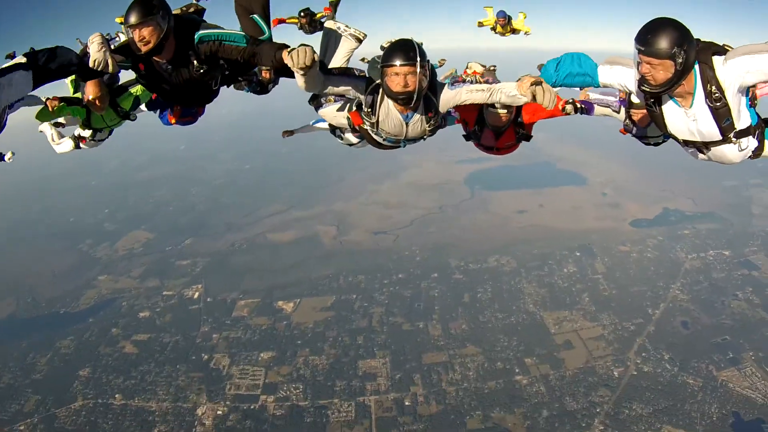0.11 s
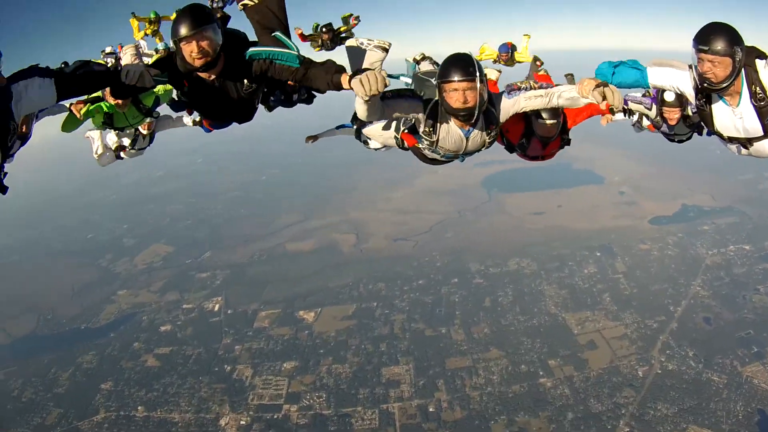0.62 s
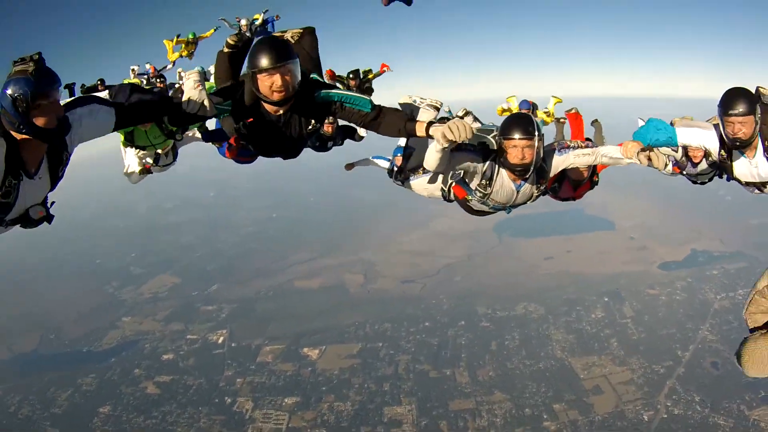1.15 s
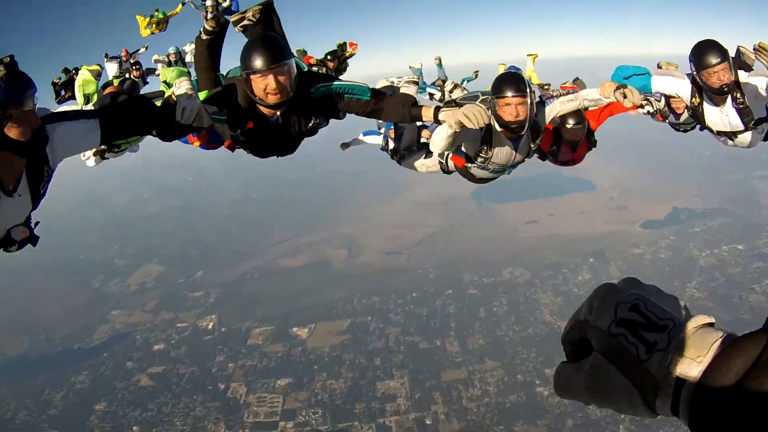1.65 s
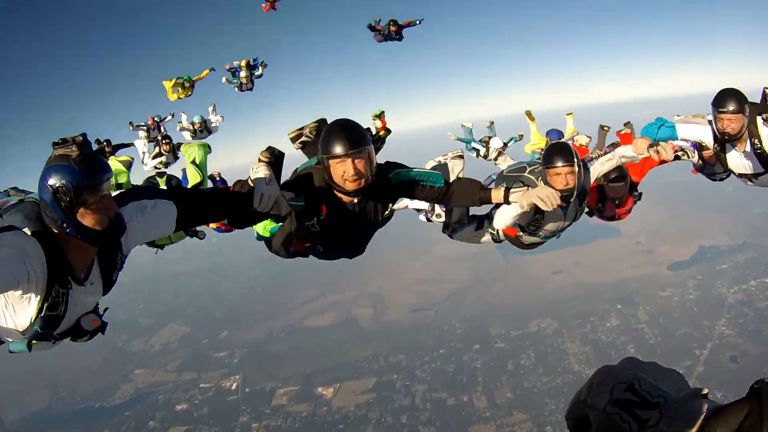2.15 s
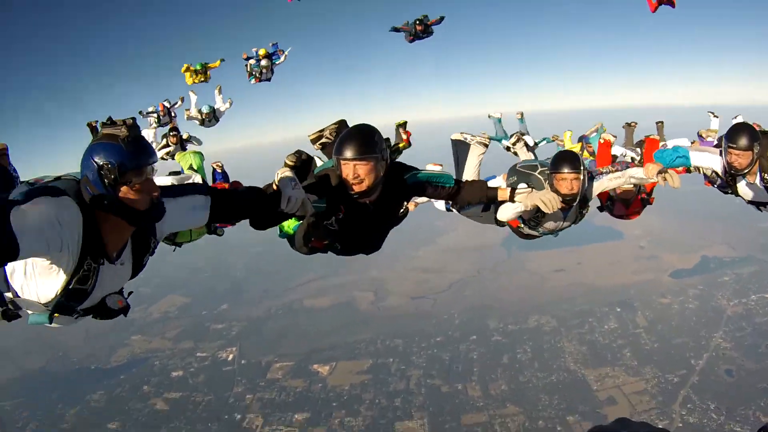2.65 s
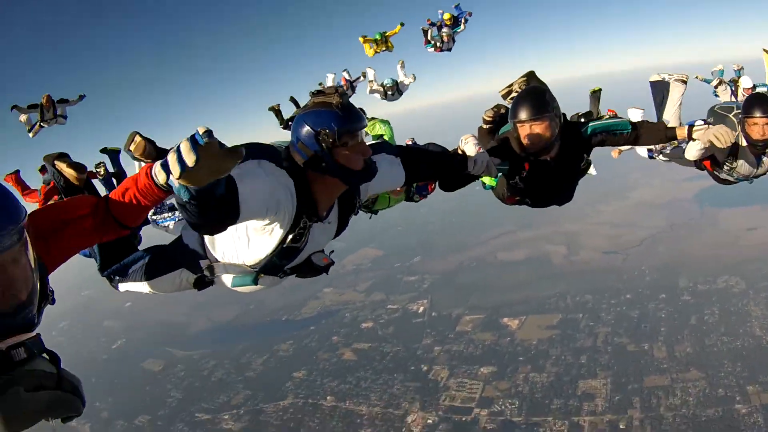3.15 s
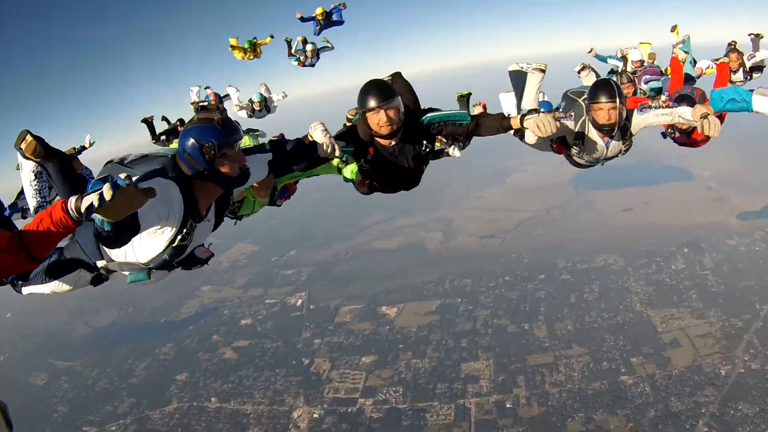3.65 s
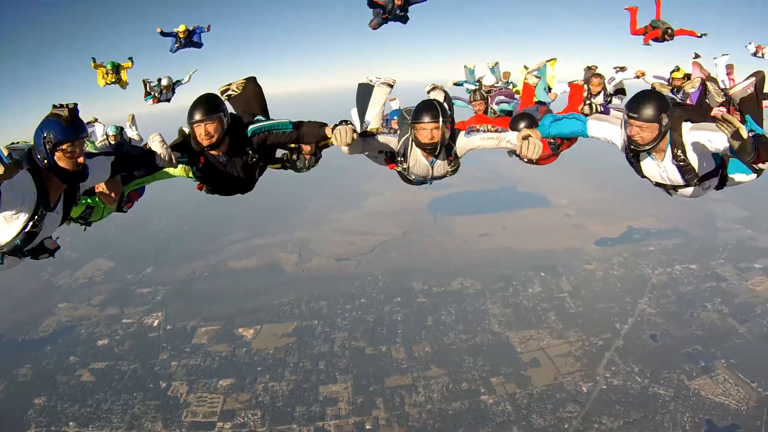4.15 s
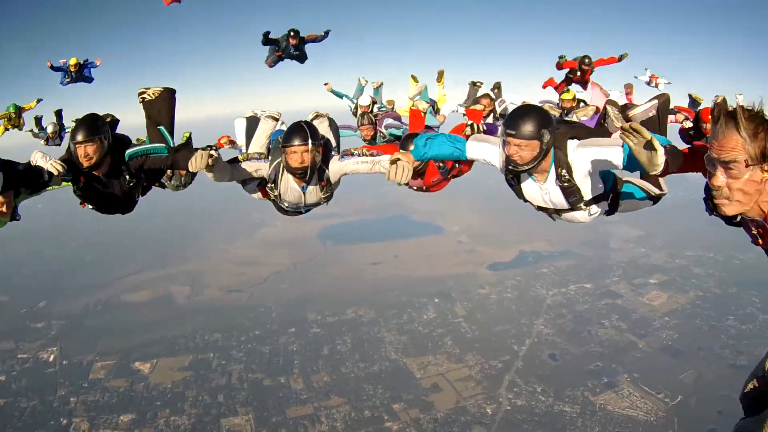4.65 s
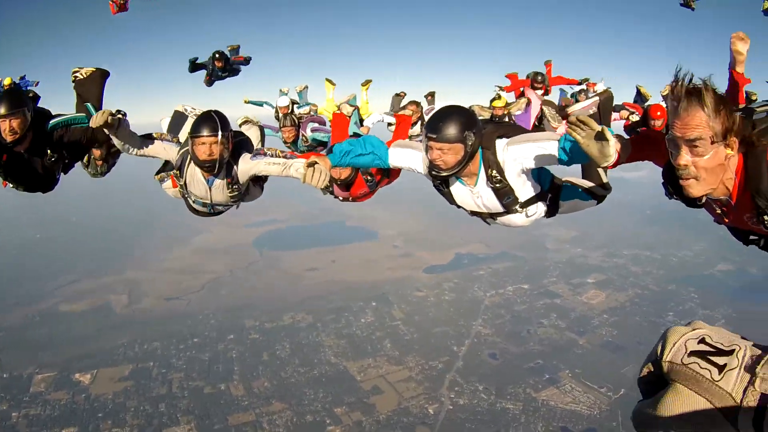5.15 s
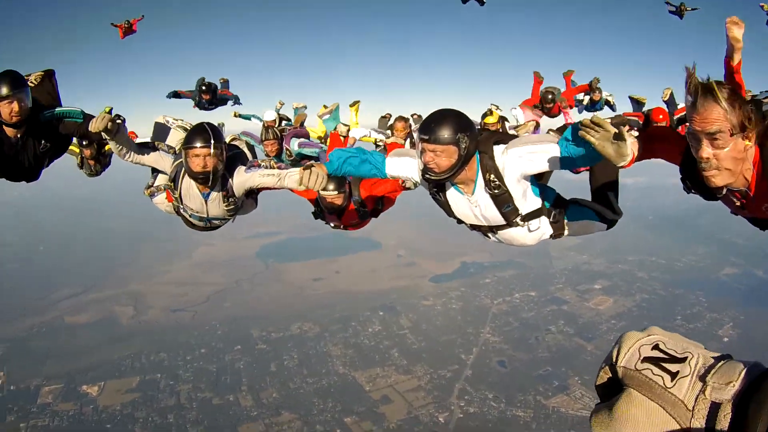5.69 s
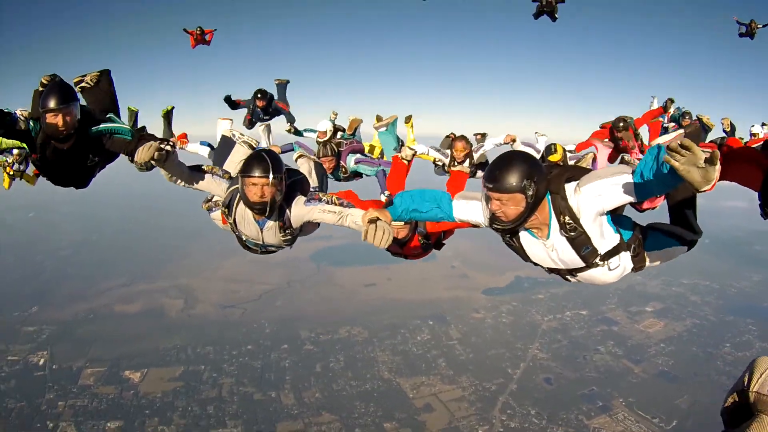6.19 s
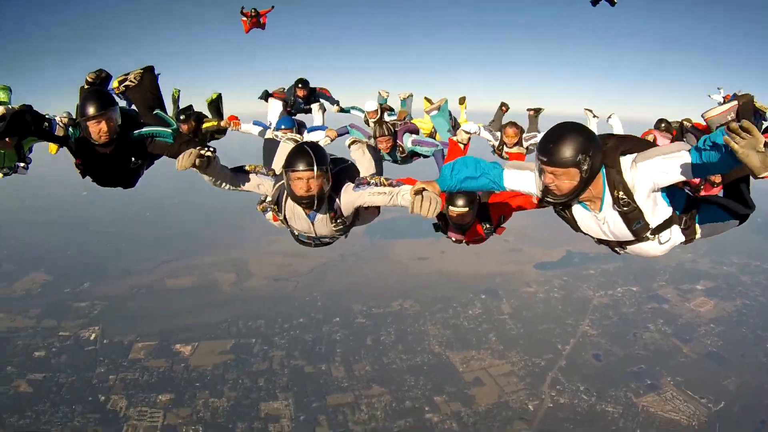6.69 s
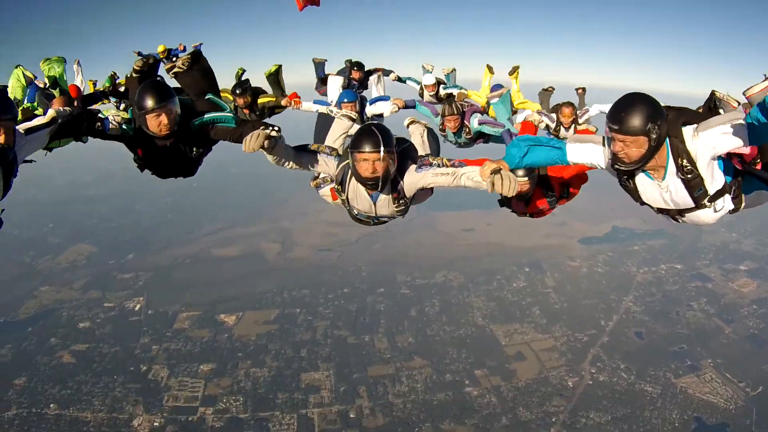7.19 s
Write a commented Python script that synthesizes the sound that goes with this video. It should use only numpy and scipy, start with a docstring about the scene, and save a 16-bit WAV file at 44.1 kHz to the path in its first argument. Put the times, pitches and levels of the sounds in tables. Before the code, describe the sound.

A skydiver's helmet microphone in free fall, high in open sky with no echo. Air tears past without pause, so strong that it overloads into a gritty, crackling roar. Raspy and hissy turbulence flutters over it in quick irregular puffs. Dry ticks snap on the housing, clustering around four seconds. The overall level stays nearly steady from start to end, with only momentary drops.

```python
"""Open sky, in free fall: air tears past a helmet microphone so hard that its capsule swings from rail to rail.
Shaped noises make the slow buffeting, the roar and drone of eddies shed off the housing, the rasp, hiss and fizz.
A soft limiter overloads their sum; a wind filter turns swings into spikes and gain control steadies the level.
Dry ticks and a faint patter ring the housing, and a little hiss seeps through it, all added past the overload."""
import sys
import numpy as np
from scipy import signal
from scipy.fft import rfft, irfft, next_fast_len
from scipy.io import wavfile
from scipy.ndimage import uniform_filter1d, map_coordinates

SR = 44100
rng = np.random.default_rng(int(sys.argv[2]) if len(sys.argv) > 2 else 0)


def linear_from_db(decibels):
    """Turn decibels (scalar or array-like) into linear amplitude factors; 0 gives 1."""
    return 10 ** (np.asarray(decibels, float) / 20)


def persist_wave(psi):
    """Save psi, clipped to +-1, as 16-bit WAV."""
    counts = np.round(np.clip(psi, -1, 1) * 32767).astype(np.int16)
    wavfile.write(sys.argv[1], SR, np.atleast_2d(counts).T)


N = 322371  # length in samples

# In all noise colours level_db is relative, per Hz: each noise is then scaled to rms 1.

# Large eddies at the port as the head turns, before the drive:
# [time_s, roar_level_db, buffet_over_roar_db, roar_pitch_hz]
LARGE_EDDIES = [(0, -27.5, 5.5, 336.2), (.45, -27, 3.5, 283.5), (.8, -24, 3.5, 310.1),
                (.97, -25.5, 3, 300.2), (1.15, -19.5, -8.5, 290.6), (1.39, -23, 3, 309.2),
                (1.46, -25, -3.5, 499.3), (1.9, -25, 1, 424.8), (2.05, -25, 1, 365.6),
                (2.8, -21.5, -3, 330.2), (3.05, -29, 3.5, 368.6), (3.5, -29, 5, 353.2),
                (3.95, -25.5, 3, 397.9), (4.2, -25, 3, 360.5), (4.33, -24, 5.5, 259.5),
                (4.5, -20.5, 4.5, 309.5), (4.62, -26, -1.5, 525), (5.5, -26.5, -3, 516),
                (6.6, -27.5, -2, 501), (7.08, -29.5, 3.5, 432), (7.2, -30, 6, 280), (7.31, -26, 13, 256.6)]
# Small eddies, before the drive: [time_s, rasp_level_db, hiss_level_db, fizz_level_db]
SMALL_EDDIES = [(0, -40.5, -46, -48.5), (.3, -42, -45.5, -50.5), (.9, -40.5, -43, -47.5),
                (1.3, -41.5, -45.5, -49.5), (1.39, -37, -43.5, -42.5), (1.52, -39.5, -56, -48.5),
                (1.75, -47, -58.5, -51), (2.0, -48, -62, -53), (2.9, -47.5, -57, -49), (3.2, -46, -50, -57),
                (3.45, -44, -48.5, -51.5), (3.75, -42, -49.5, -50), (4.1, -41, -46.5, -47.5),
                (4.28, -37.5, -46, -44.5), (4.32, -47, -46.5, -55), (4.4, -41.5, -48, -49.5),
                (4.49, -44.5, -42, -47), (4.58, -35.5, -49.5, -43.5), (4.68, -39, -49.5, -48),
                (4.78, -36.5, -48.5, -48), (5.05, -42, -51, -45.5), (5.6, -40, -50.5, -45),
                (6.1, -43, -50.5, -46.5), (6.5, -39.5, -50, -47.5), (6.8, -43.5, -48.5, -49.5),
                (7.1, -40.5, -48.5, -51), (7.24, -44.5, -45, -49.5), (7.31, -48, -45.5, -49)]
# Colour of the roar: [multiple_of_roar_pitch, level_db]
ROAR_COLOUR = [(.2, -22), (.45, -4.5), (.7, -4.5), (.9, -4), (1.2, -6), (1.7, -11), (2.6, -20.5), (5, -40),
               (12, -62)]
# Colour of the slow buffeting: [frequency_hz, level_db]
BUFFET_COLOUR = [(3, -11.5), (12, -15.5), (40, -7.5), (100, -7), (200, -12), (400, -49.5), (800, -78.5)]
# Colour of the narrow low drone: [frequency_hz, level_db]
DRONE_COLOUR = [(90, -42.5), (170, -2.5), (245, 2), (330, -10), (600, -54)]
# Colour of the rasp: [frequency_hz, level_db]
RASP_COLOUR = [(500, -34.5), (900, -1.5), (1400, -6), (2200, -12.5), (3000, -23.5), (5000, -59)]
# Breathy resonance of the port: [frequency_hz, level_db]
HISS_COLOUR = [(2000, -16.5), (2600, -9.5), (3200, -7), (3800, -4.5), (4250, -15), (5200, -39.5)]
# Colour of the fizz: [frequency_hz, level_db]
FIZZ_COLOUR = [(1800, -23.5), (2600, -11), (4500, -0.5), (6300, -6), (8000, -14.5), (10200, -17.5),
               (11500, -49), (14000, -82.5)]
# How deeply the stream flaps: [time_s, rms_depth_db]
FLAP_DEPTH = [(0, 2.6), (1.3, 1.5), (2.0, 3), (2.9, 0.5), (3.1, 2), (4.3, 0.5), (4.7, 1), (6.2, 1.1),
              (6.5, 2), (7.31, 2)]
# How fast the stream flaps: [frequency_hz, level_db]
FLAP_RATE = [(6, -30.5), (16, -5), (45, -5), (120, -5), (300, -43.5)]
# Colour of the even hiss through the housing: [frequency_hz, level_db]
SEEP_COLOUR = [(700, -24.5), (1800, 8), (3200, -8.5), (4500, -2), (8000, -10.5), (10500, -23.5),
               (13000, -61.5)]
# Bright puffs of small eddies, a negative rise being a dip: [start_s, fizz_rise_db, length_s]
PUFF_TIMES = [(0.03, 5.5, 0.071), (0.196, 3, 0.017), (0.262, 8, 0.029), (.36, 3.5, 0.058),
              (0.637, 3.5, 0.022), (0.75, 3, 0.099), (1.41, 9, 0.07), (1.691, 6, 0.046), (1.866, 8.5, 0.05),
              (2.1, 3, 0.02), (2.346, 3, .03), (3.03, 9, 0.034), (3.185, 3.5, 0.045), (3.462, 4, 0.02807),
              (3.56, 1.5, 0.014), (3.641, 1, .026), (4.08, 3, 0.045), (4.516, 12.5, 0.06),
              (5.618, 0, 0.031), (6.561, 6, 0.03), (6.638, 4, .02), (6.7, 4, 0.032), (6.815, 7.5, 0.025),
              (6.954, -2, .015), (7.044, 7, .016), (7.078, 5.5, 0.029)]
# Dry ticks and snaps on the housing, level being that of the whole ring: [start_s, level_db]
TICK_TIMES = [(0.1963, -12), (0.5393, -13), (1.3522, -17), (1.5611, -12), (2.0649, -14), (2.1043, -17),
              (2.1865, -17), (2.3476, -14), (3.3200, -12), (3.4176, -7), (3.5676, -11), (3.6408, -7),
              (3.7956, -17), (3.9499, -4), (4.0232, -3), (4.0885, -7), (4.2212, -7), (4.5227, -10),
              (6.5846, -3), (6.8273, -8), (7.0959, -2)]
# Modes of the housing, before small random shifts of level and pitch: [frequency_hz, level_db, t60_s]
HOUSING_MODES = [(1500, -8, .003), (2200, 1, .003), (2900, 2, .0028), (3700, 2, .0028), (4600, -2, .0025),
                 (6200, -5, .0025), (8300, -16, .002)]
# Big slow eddies that pin the capsule on a rail: [release_s, length_s]
STALL_TIMES = [(0.271, 0.0059), (0.506, 0.0036), (0.55, 0.01), (0.741, 0.012), (0.774, 0.0044),
               (1.171, .006), (1.366, 0.012), (1.534, 0.0061), (1.562, .005), (1.648, 0.015),
               (2.816, 0.016), (2.994, 0.011), (3.096, 0.01), (3.13, 0.015), (3.654, 0.0039),
               (4.303, 0.007), (4.689, 0.0032), (6.444, 0.0081), (6.712, 0.0044), (6.8719, .01),
               (6.958, 0.0035), (6.979, 0.0037), (7.056, 0.004), (7.071, 0.0089)]
# Moments when the stream drops away, a negative depth being a rise: [start_s, depth_db, length_s]
LULL_TIMES = [(1.52, 4, 0.01), (1.623, 8, 0.0088), (1.832, 7, .01), (3.072, 2.5, 0.013), (3.103, 6, 0.021),
              (3.159, 5.5, .022), (3.546, 5, 0.017), (4.027, 6.5, 0.019), (4.241, 9, .012), (4.297, 7, .02),
              (6.633, 9, 0.012), (6.783, 5, 0.0096), (6.851, -1, .013), (7.058, 0, 0.01)]

REST_HZ = 400  # roar pitch at which the row of eddies passes at its own speed
DRIVE_DB = 20.5  # lifts the whole wind into overload
DRONE_DB, DRONE_DB_PER_OCTAVE = -8.5, -10  # over the roar at rest pitch; change per octave of roar pitch
PUFF_ROAR, PUFF_RASP, PUFF_HISS = 0.14, 0.59, 0.61  # dB of rise for each dB of fizz
PUFF_ATTACK_S, PUFF_FADE = 0.0033, 0.51  # rise; fade as a share of the length
SEEP_DB, SEEP_HISS_DB = 4.5, 7.5  # even hiss over the rasp; port resonance over the port hiss
TICK_ATTACK_S = 0.0002
PATTER_PER_S, PATTER_DB, PATTER_SPREAD_DB = 60, 24.5, 4  # rate; level over the port hiss; spread each way
STALL_PUSH, STALL_GRIP_S, STALL_SNAP_S = 1.4, 0.0015, 0.00053  # added pressure; rise; release
REBOUND, REBOUND_S = 1.7, 0.0013  # pressure towards the other rail; its length
LULL_FALL_S, LULL_RETURN_S = 0.0024, 0.0012


def unit(x):
    """Scaled to rms 1."""
    return x / np.sqrt(np.mean(x ** 2) + 1e-20)


def filtered(x, response):
    """x filtered by a complex response of frequency."""
    m = next_fast_len(len(x) + 8192)  # spare room, so that the end does not wrap round to the start
    spectrum = rfft(x, m) * response(np.fft.rfftfreq(m, 1 / SR))
    return irfft(spectrum, m)[:len(x)]


def noise(colour, size=N):
    """Noise of rms 1 with the given colour."""
    f, db = np.transpose(colour)

    def response(hz):
        return linear_from_db(np.interp(np.log(hz + 0.1), np.log(f), db))

    return unit(filtered(rng.standard_normal(size), response))


def wobble(rate):
    """A smooth random curve through a given number of random points a second."""
    return map_coordinates(rng.standard_normal(N // 64), [np.arange(N) * rate / SR])


def curves(rows):
    """One value per sample for each column after the time."""
    s, *columns = np.transpose(rows)
    return [np.interp(np.arange(N) / SR, s, c) for c in columns]


def smooth_step(u):
    """A smooth step from 0 to 1, halfway at u = 0."""
    return 0.5 + 0.5 * np.tanh(u)


def eddies(pitch_hz):
    """A frozen row of eddies carried past the port: faster passage raises the pitch of the whole roar."""
    row = noise([(k * REST_HZ, db) for k, db in ROAR_COLOUR], size=3 * N)
    speed = np.clip(pitch_hz / REST_HZ, 0, 3)
    return map_coordinates(row, [np.cumsum(speed)], order=3)


def roar(level_db, pitch_hz, puff_db):
    """Eddies shed off the housing, with an unsteady level and pitch."""
    unsteady_db = 0.13 * wobble(19) + 0.26 * wobble(7)
    return linear_from_db(level_db + PUFF_ROAR * puff_db + unsteady_db) * eddies(pitch_hz * (1 + 0.04 * wobble(20)))


def buffet(level_db):
    """Slow pressure swings of large eddies; the wind filter later hides most of them."""
    return linear_from_db(level_db + 2.6 * wobble(9)) * noise(BUFFET_COLOUR)


def drone(roar_db, pitch_hz):
    """Regularly shed eddies: a narrow low band that grows as the roar drops in pitch."""
    octaves = np.log2(pitch_hz / REST_HZ)
    return linear_from_db(roar_db + DRONE_DB + DRONE_DB_PER_OCTAVE * octaves) * noise(DRONE_COLOUR)


def rasp(level_db, puff_db, clumps):
    """Small eddies in the middle of the range, in gusty clumps."""
    return linear_from_db(level_db + PUFF_RASP * puff_db + 1.4 * clumps + 1.2 * wobble(6)) * noise(RASP_COLOUR)


def port_hiss(level_db, puff_db, clumps):
    """Small eddies colour their noise with the breathy resonance of the port."""
    return linear_from_db(level_db + PUFF_HISS * puff_db + 1.4 * clumps + 2 * wobble(70)) * noise(HISS_COLOUR)


def fizz(level_db, puff_db, clumps):
    """The brightest noise of the small eddies, with a quick grain."""
    return linear_from_db(level_db + puff_db + 0.4 * clumps + 2.3 * wobble(90)) * noise(FIZZ_COLOUR)


def flapping():
    """Quick random rise and fall of the stream, in dB."""
    return curves(FLAP_DEPTH)[0] * noise(FLAP_RATE)


def wind():
    """Pressure at the capsule, where 1 is the overload point; flaps and lulls spare the buffeting."""
    roar_db, buffet_db, pitch_hz = curves(LARGE_EDDIES)
    rasp_db, hiss_db, fizz_db = curves(SMALL_EDDIES)
    puff_db, clumps = puffs(), wobble(30)  # shared, so that the small eddies swell together
    stream = roar(roar_db, pitch_hz, puff_db) + drone(roar_db, pitch_hz)
    stream += rasp(rasp_db, puff_db, clumps)
    stream += port_hiss(hiss_db, puff_db, clumps)
    stream += fizz(fizz_db, puff_db, clumps)
    stream *= linear_from_db(flapping() - lulls())
    return linear_from_db(DRIVE_DB) * (stream + buffet(roar_db + buffet_db))


def seepage():
    """A faint hiss through the housing fills the moments on a rail; the port breathes in it."""
    rasp_db, hiss_db, _ = curves(SMALL_EDDIES)
    puff_db = puffs()
    even = linear_from_db(rasp_db + PUFF_RASP * puff_db + SEEP_DB) * noise(SEEP_COLOUR)
    breath_db = hiss_db + PUFF_HISS * puff_db - lulls() + SEEP_HISS_DB + 2.2 * wobble(16)
    return even + linear_from_db(breath_db) * noise(HISS_COLOUR)


def puffs():
    """Rise in dB of the small eddies: each puff sets in quickly, holds and fades, a long one more slowly."""
    t = np.arange(N) / SR
    rise_db = np.zeros(N)
    for s, db, length in PUFF_TIMES:
        fade = smooth_step((s + length - t) / (PUFF_FADE * length))
        rise_db += db * smooth_step((t - s) / PUFF_ATTACK_S) * fade
    return rise_db


def patter():
    """Start in seconds and level in dB of faint ticks at random, which follow the port hiss."""
    place, spread = rng.random((2, PATTER_PER_S * N // SR))
    hiss_db = curves(SMALL_EDDIES)[1][(place * N).astype(int)]
    level_db = hiss_db + PATTER_DB + PATTER_SPREAD_DB * (2 * spread - 1)
    return np.c_[place * N / SR, level_db]


def ticks():
    """Each tick rings the modes of the housing anew, as dying sines carried past the overloaded port."""
    out = np.zeros(N + SR)
    t = np.arange(SR // 100) / SR
    attack = 1 - np.exp(-t / TICK_ATTACK_S)
    hz, level_db, t60 = np.transpose(HOUSING_MODES)[:, :, None]
    for s, db in [*TICK_TIMES, *patter()]:
        size, tune = rng.standard_normal((2, len(HOUSING_MODES), 1))
        decay = linear_from_db(level_db + 1.5 * size - 60 * t / t60)
        ring = decay * np.sin(2 * np.pi * hz * (1 + 0.06 * tune) * t)
        out[round(s * SR):][:len(t)] += linear_from_db(db) * attack * ring.sum(axis=0)
    return out[:N]


def stalls():
    """Big slow eddies push steadily towards the upper rail; each lets go with a snap and a short rebound."""
    t = np.arange(N) / SR
    pressure = np.zeros(N)
    for s, length in STALL_TIMES:
        push = smooth_step((t - s + length) / STALL_GRIP_S) * smooth_step((s - t) / STALL_SNAP_S)
        back = smooth_step((t - s) / STALL_SNAP_S) * smooth_step((s + REBOUND_S - t) / STALL_SNAP_S)
        pressure += STALL_PUSH * push - REBOUND * back
    return pressure


def lulls():
    """Drop in dB as the stream falls away for a moment and quickly returns."""
    t = np.arange(N) / SR
    drop_db = np.zeros(N)
    for s, db, length in LULL_TIMES:
        back = smooth_step((s + length - t) / LULL_RETURN_S)
        drop_db += db * smooth_step((t - s) / LULL_FALL_S) * back
    return drop_db


def overload(x, bias, knee, leak):
    """Soft rails near -1 and 1 that still give a little; the bias lets the capsule rest longer on the upper one."""
    x = x + bias
    return x / (1 + np.abs(x) ** knee) ** (1 / knee) + leak * x


def scene():
    """The air stream drives the capsule onto its rails; what the housing carries rides on top."""
    capsule = overload(wind() + stalls(), bias=0.42, knee=1.0, leak=0.0087)
    return (capsule + ticks() + seepage())[None]


def wind_filter(x, cut_hz, coupling_hz, top_hz, edge_hz):
    """Two gentle high-passes turn each rail-to-rail swing into a spike; two low-passes round it."""
    def high(f, c):
        return 1j * f / (c + 1j * f)

    def low(f, c, q):
        return c * c / (c * c - f * f + 1j * f * c / q)

    def response(f):
        return high(f, cut_hz) * high(f, coupling_hz) * low(f, top_hz, 0.27) * low(f, edge_hz, 0.89)

    return filtered(x, response)


def gain_control(x, target_db, seconds, firmness):
    """Gain follows the level around each moment and pulls it part of the way to the target."""
    power = uniform_filter1d(x ** 2, int(seconds * SR))
    level = np.sqrt(np.abs(power) + 1e-9)
    return x * (linear_from_db(target_db) / level) ** firmness


def band_limit(x):
    """A steep low-pass at the top of the band."""
    return signal.sosfilt(signal.butter(12, 12300, fs=SR, output="sos"), x)


def record(dry):
    """The microphone's wind filter and gain control shape the finished mix."""
    spikes = wind_filter(dry[0], cut_hz=746, coupling_hz=68.0, top_hz=3900, edge_hz=3360)
    mix = gain_control(spikes, target_db=-21.5, seconds=0.16, firmness=0.67)
    return band_limit(mix[None])


dry = scene()
out = record(dry)
persist_wave(out)
```